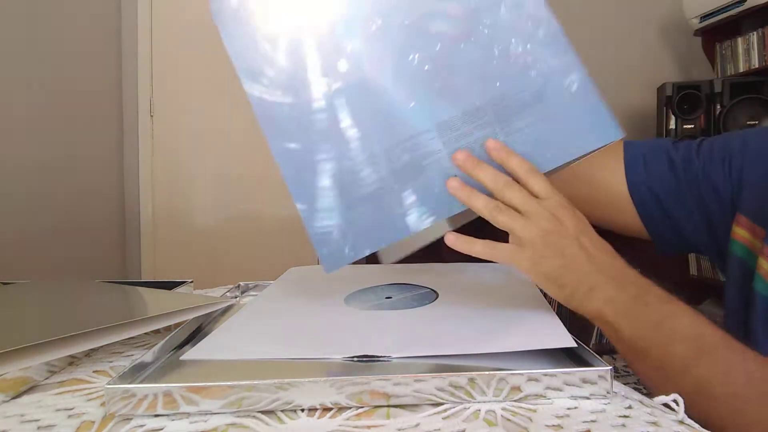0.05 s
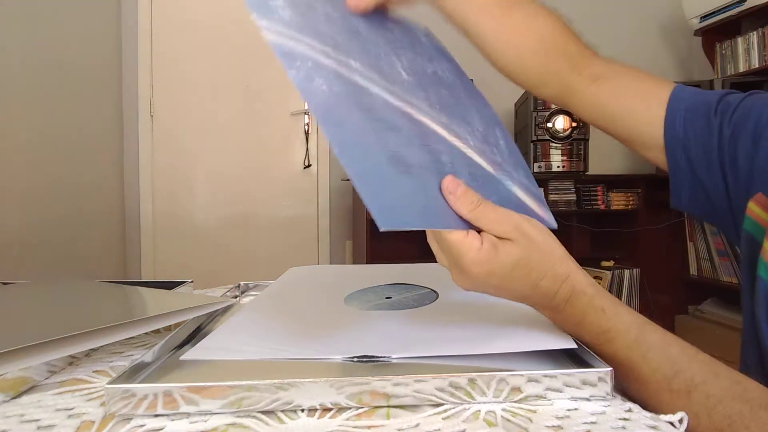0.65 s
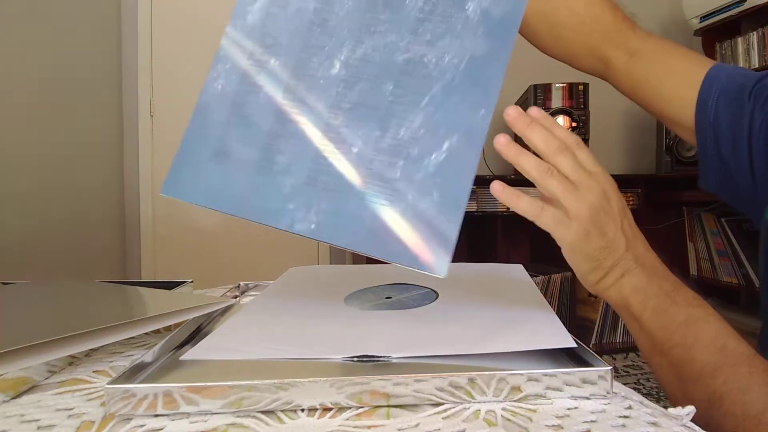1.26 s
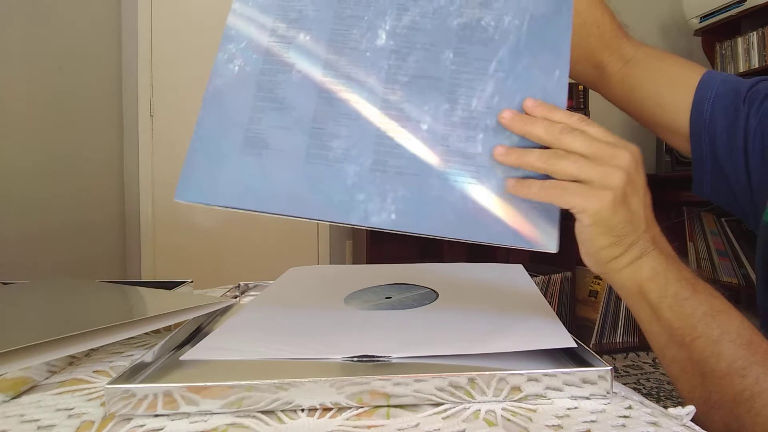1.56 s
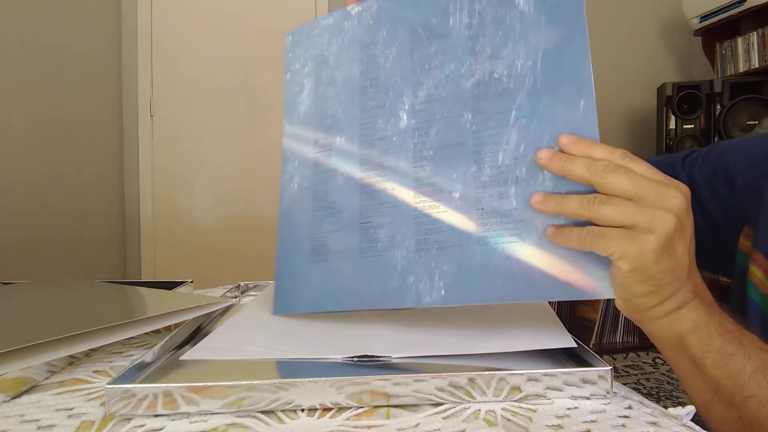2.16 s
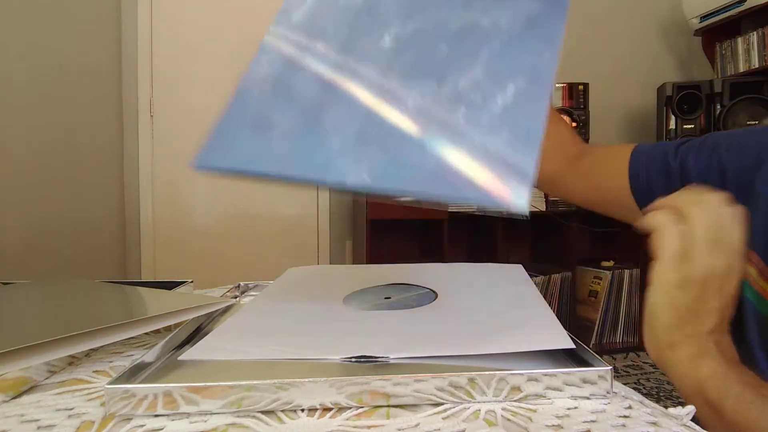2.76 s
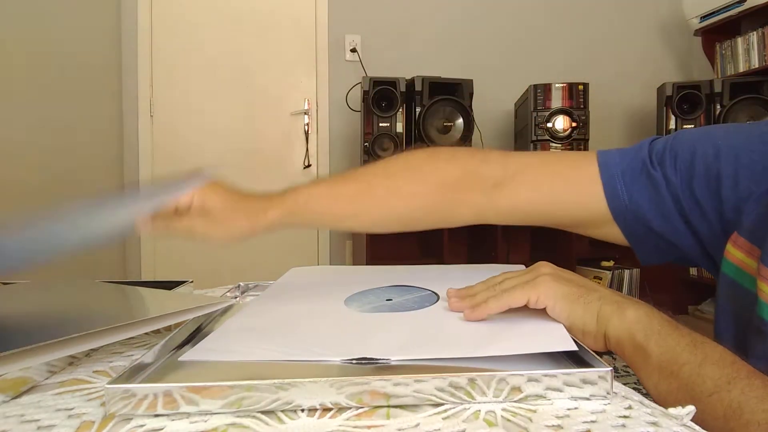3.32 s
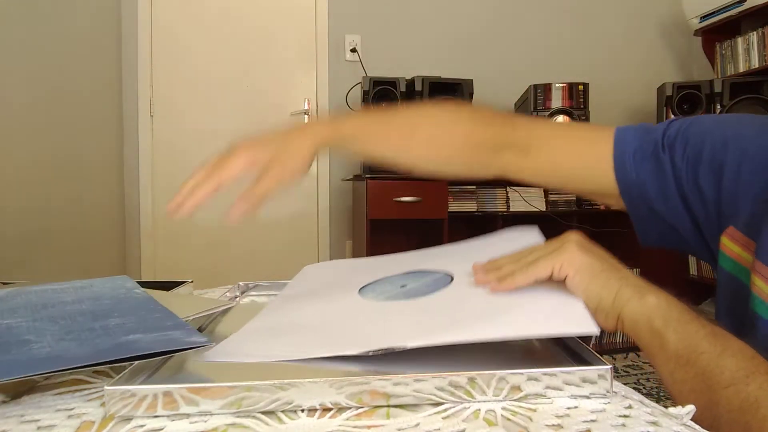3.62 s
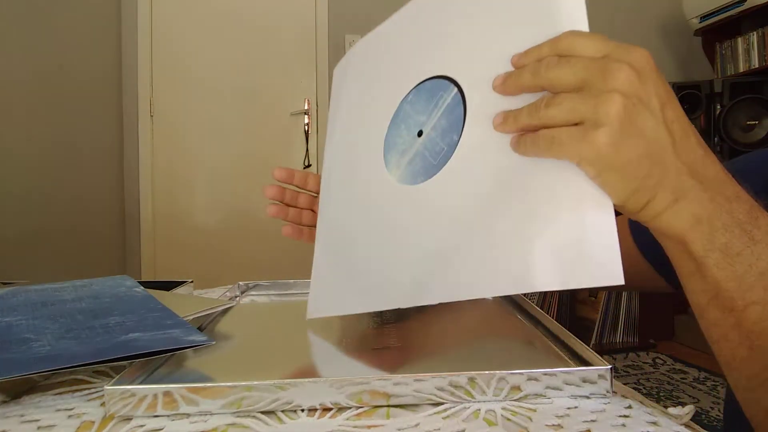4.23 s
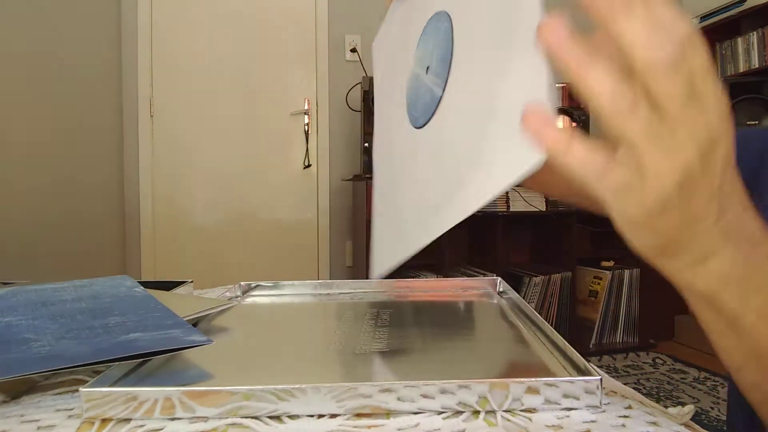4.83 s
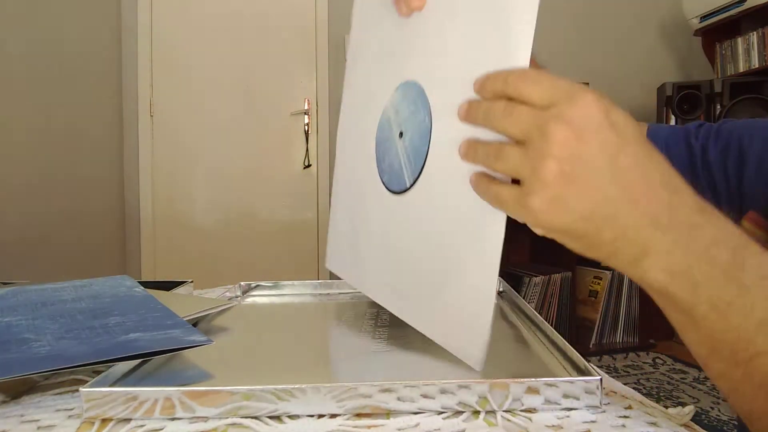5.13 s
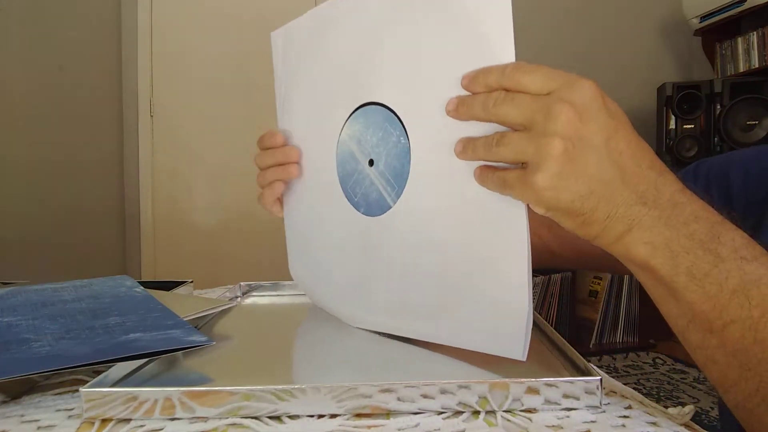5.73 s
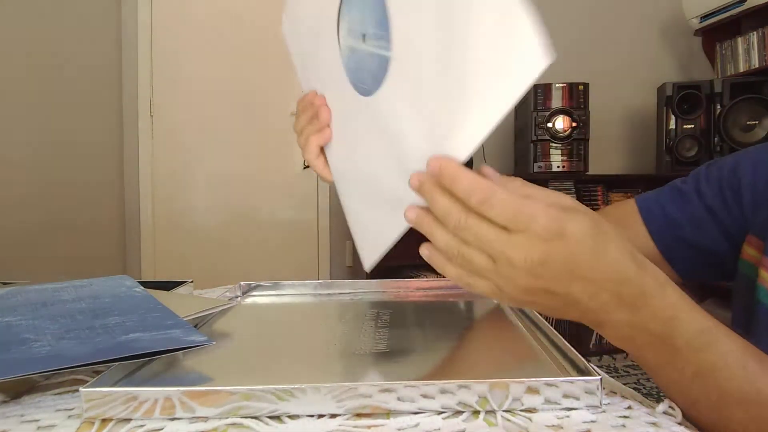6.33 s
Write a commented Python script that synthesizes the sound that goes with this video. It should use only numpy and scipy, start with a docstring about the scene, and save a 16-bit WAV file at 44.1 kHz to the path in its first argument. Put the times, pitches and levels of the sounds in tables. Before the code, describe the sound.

A card insert is turned over in the hands, flexing with soft hollow bumps and a grainy sliding hiss. After a quieter stretch of finger rubs it is set down with a few knocks. A record in its paper sleeve is then lifted from a box and turned, with louder swipes, scrapes, crinkles and taps. The sound is close, in phone stereo, in a small furnished room with faint background noise.

```python
"""A grainy hiss of sliding paper comes first, close to a phone's two microphones in a small furnished room.
A card insert and a record in its paper sleeve are lifted from a box and turned over. Fibres catch and slip
under the fingers, bent sheets flutter and give way with hollow notes, hands and disc knock the card,
creases tick and edges scrape. Faint room noise lies underneath; the phone widens it all into stereo."""
import sys
import numpy as np
from scipy import signal
from scipy.fft import rfft, irfft
from scipy.io import wavfile

SR = 44100
rng = np.random.default_rng(int(sys.argv[2]) if len(sys.argv) > 2 else 0)


def wav_record(signal):
    """Record a signal, one row per channel, as 16-bit PCM in the file named by sys.argv[1]."""
    frames = np.transpose(np.atleast_2d(signal))
    bounded = np.clip(frames, -1, 1)
    # unit amplitude maps onto the largest positive 16-bit level
    quanta = np.round(bounded * 32767).astype(np.int16)
    wavfile.write(sys.argv[1], SR, quanta)


N = 281358
TIME = np.arange(N) / SR
FREQ = np.maximum(np.arange(N // 2 + 1) * SR / N, 1)

# spectra of the room tone and the paper's friction: (frequency [Hz], relative density [dB])
ROOM_TONE_SPECTRUM = [(28, -38), (40, -12), (57, 8), (80, -15), (120, -1.5), (200, 2), (300, -6.5),
                      (600, -10), (1100, -8.5), (1700, -15.5), (3500, -13.5), (8000, -19.5), (12500, -24.5),
                      (14200, -47), (14800, -67)]
HISS_SPECTRUM = [(3000, -17), (5500, -11), (7000, -5.5), (8000, -9.5), (9200, -2.5), (10200, -4),
                 (11500, 3), (12900, 2), (14100, 0), (14700, -58)]
RASP_SPECTRUM = [(700, -0.5), (1500, 1), (2200, 0.5), (3000, 7), (3900, 3), (4800, 6), (5700, 3.5),
                 (6800, 0.5), (10000, -4), (14000, -1), (14700, -42)]
FLUTTER_SPECTRUM = [(35, -40), (60, 0.5), (120, -3), (220, -1.5), (420, -1), (680, -2.5), (900, -3),
                    (1250, -5), (1800, -9), (3000, -11.5), (14000, -24), (14700, -64)]
# bands of the rasp and the hiss that swell and fade at random
RASP_CENTRES_HZ, HISS_CENTRES_HZ = 1500 * 2 ** (np.arange(5) * .6), 6000 * 2 ** (np.arange(5) * .3)
# the held sheets are never quite still: (time [s], hiss [dB], flutter [dB])
GRIP = [(0, -69.5, -72), (0.42, -61.5, -85), (0.6, -70.5, -71), (1.1, -67.5, -62), (1.9, -66.5, -65.5),
        (2.2, -72.5, -67.5), (2.6, -69.5, -67), (3.3, -62.5, -64.5), (3.9, -61, -62), (4.8, -62, -60.5),
        (5.0, -69, -59), (5.5, -60, -66), (6.38, -63, -62)]
# long drags of sheet over sheet: (start [s], attack [s], length [s], hiss [dB], rasp re hiss [dB])
DRAGS = [(0.036, 0.0091, 0.31, -58.5, -3), (0.619, 0.013, 0.44, -55, -5.5), (1.439, 0.009, 0.16, -62, 3),
         (2.28, 0.071, 0.21, -62, 6), (2.93, 0.16, 0.25, -59.5, -33), (3.311, .005, 0.18, -53.5, -0.5),
         (3.542, 0.076, 0.35, -51.5, -6), (3.895, 0.018, 0.23, -61, 1.5), (4.278, 0.0067, 0.4, -52.5, -2),
         (5.044, 0.017, 0.31, -53, -4), (5.23, 0.0074, 0.17, -42.5, -3), (5.596, 0.008, 0.265, -46.5, -5.5),
         (5.982, 0.044, 0.43, -59, -9)]
# quick swipes of a finger or sheet; widths under 0.01 s count as 0.01 s:
# (fastest moment [s], width to fade 20 dB either side [s], hiss [dB], rasp re hiss [dB])
SWIPES = [(0.735, 0.05, -44.5, -5), (0.783, 0.03, -46, -13), (0.968, 0.02, -42.5, -7.5),
          (1.727, 0.06, -45.5, -9.5), (2.06, 0.04, -53, 2), (2.352, -0.06, -48.5, -1),
          (2.428, -0.0067, -49.5, 2.5), (2.53, 0.1, -57, -6), (2.715, 1.4, -68, -9),
          (2.885, -0.1, -58.5, -12.5), (3.374, 0.04, -48, -20), (3.448, 0.01, -44.5, -11),
          (3.74, 0.18, -51.5, -7), (4.384, 0.05, -42, -4.5), (4.48, 0.016, -43, 5),
          (4.541, 0.035, -42, -1.5), (4.636, 0.07, -43, -4.5), (5.258, -0.01, -49.5, 9),
          (5.614, 0.02, -46, -3), (5.737, 0.01, -38, -2.5), (5.838, 0.1, -46, -24),
          (6.218, 0.13, -52.5, -19), (6.295, -0.0338, -37.5, -12), (6.374, 0.03, -39.5, -28)]
# a sheet is bent and settles: (start [s], flutter [dB], time to fade 20 dB [s], taken as 1 ms at least)
FLEXES = [(0.037, -54.5, 1.05), (0.183, -49.5, 0.27), (0.633, -51.5, 0.5), (0.965, -53.5, 0.5),
          (1.445, -51, 0.03), (2.26, -55.5, 0.8), (2.412, -48.5, 0.09), (3.318, -45, 0.32),
          (3.619, -55, 0.6), (4.033, -54, 0.3), (4.277, -51.5, .5), (4.511, -49, 0.32), (5.075, -55, 4),
          (5.233, -44, 0.06), (5.40, -56.5, 1.5), (5.679, -46.5, 0.06), (5.911, -59, -1.7)]
# resonances of the sheets and the box: (frequency [Hz], t60 [s], relative level [dB])
CARD_MODES = [(97, 0.87, -6), (146, 0.34, 1.5), (249.6, 0.35, 3.5), (301, 0.043, -4.5), (337, 0.063, -10),
              (400, 0.018, -7.5), (608, 0.038, -8), (682, 0.31, -25), (1003, 0.11, -18), (1230, 0.12, -47)]
# knocks and flaps of the card and the sleeved disc:
# (time [s], level [dB], centre [Hz], t60 [s], thump [dB], hardness [0-1])
KNOCKS = [(0.044, -56, 870, 0.015, -60, 0.7), (0.08, -50, 320, 0.2, -54, 0.1),
          (0.136, -49.5, 396, 0.037, -56, 0.34), (0.2, -51, 700, 0.073, -50.5, .1),
          (0.233, -52, 480, 0.086, -50, 0), (0.254, -43.5, 1150, 0.081, -56, 0.5),
          (0.415, -56.5, 262, 0.12, -50, 0.33), (0.6317, -57, 1010, 0.02, -55, 0.7),
          (0.642, -46.5, 340, 0.46, -46.5, .1), (0.994, -51.5, 365, 0.28, -48.5, 0.6),
          (1.451, -57, 900, 0.066, -62, .5), (1.555, -61, 600, 0.02, -64, 0.7),
          (2.259, -49, 603, 0.012, -53.5, 0.8), (2.272, -57.5, 290, 0.095, -58, 0),
          (2.435, -54.5, 298, 0.31, -64, 0), (3.318, -42, 414, 0.034, -47, 1),
          (3.332, -42.5, 745, 0.05, -60, 0.8), (3.371, -44.5, 610, 0.025, -60, 0.9),
          (3.46, -48, 597, 0.056, -53.5, 0.6), (3.598, -54.5, 500, 0.016, -80, 0.3),
          (3.633, -52, 700, 0.025, -64, 0.5), (3.69, -50.5, 385, 0.084, -52.5, 0.1),
          (4.0331, -39.5, 980, 0.17, -56, 0.89), (4.285, -43.5, 980, 0.055, -54.5, 0),
          (4.401, -48, 282, 0.082, -50, 0.3), (4.518, -45, 1190, 0.068, -63, 0.15),
          (4.5549, -42, 1050, 0.1, -50, 0.5), (4.559, -38.5, 300, 0.026, -42.5, 0.67),
          (4.578, -43.5, 600, 0.052, -68, 0.03), (4.627, -35, 706, 0.049, -39, 0.8),
          (5.076, -58, 486, 0.094, -46, 0.93), (5.16, -50.5, 366, 0.029, -59, 0.8),
          (5.237, -36.5, 1000, 0.2, -44, 0.26), (5.2846, -31, 690, 0.0098, -48, 1),
          (5.343, -39.5, 764, 0.016, -59, 0.7), (5.40, -50.5, 590, 0.027, -69, 0.6),
          (5.425, -49, 398, 0.036, -60, 0), (5.516, -51, 606, 0.028, -79, 0.6),
          (5.701, -41, 754, 0.17, -63, 0.2), (5.788, -53, 520, 0.12, -63, 0),
          (5.878, -45, 610, 0.025, -63, 0.8), (5.886, -48, 445, 0.033, -56.5, 0.9),
          (5.911, -40.5, 670, 0.012, -66, .7)]
# crease ticks and finger scuffs:
# (time [s], treble [dB], treble centre [Hz], snap [dB], snap centre [Hz], t60 [s], hardness [0-1])
TICKS = [(0.045, -60, 10100, -56.5, 2830, 0.012, 0.7), (0.194, -64, 10000, -59, 3500, 0.016, 0.7),
         (0.259, -47, 11000, -58, 3000, 0.089, 0.2), (0.6327, -43.5, 12300, -50.5, 2700, 0.015, 0.7),
         (1.017, -47.5, 12400, -63, 3500, 0.048, 0.3), (1.45, -48.5, 10500, -48.5, 2500, 0.15, 0.4),
         (1.554, -56, 9800, -56.5, 4020, 0.0087, 0.5), (1.5566, -55, 9800, -60, 4200, .012, 0.4),
         (2.09, -54, 11000, -66, 3500, 0.06, 0.1), (2.2597, -61, 9500, -45.5, 2230, 0.02, 0.45),
         (2.415, -53.5, 9800, -52, 3100, 0.062, 0.2), (2.479, -50, 10000, -57, 3100, 0.02, 0.2),
         (3.3175, -50, 10900, -53, 2830, 0.044, 0.3), (3.329, -46.5, 10900, -51, 2800, 0.032, 0.3),
         (3.46, -61, 10900, -47.5, 3060, 0.058, 0.2), (3.633, -43.5, 9050, -41.5, 3850, 0.021, 0.24),
         (3.648, -46, 11700, -50, 3300, 0.015, 0), (4.0341, -66, 9200, -41.5, 2930, 0.0094, 0.4),
         (4.279, -47.5, 10400, -55, 3000, 0.059, 0.3), (4.346, -44, 9200, -67, 3500, 0.014, 0.2),
         (4.463, -39.5, 8250, -51, 3600, 0.13, 0.6), (4.626, -33, 10800, -45, 3180, 0.03, 0.2),
         (4.701, -47, 12100, -56, 3200, 0.0032, 0.2), (5.075, -46.5, 12500, -75, 3100, .03, 0.4),
         (5.104, -47, 11900, -55, 5000, 0.02, 0), (5.237, -36, 9100, -31, 3580, 0.009, 0.1),
         (5.283, -42, 9750, -39, 3050, 0.038, 0.3), (5.409, -43.5, 10000, -37.5, 3140, 0.025, 0),
         (5.911, -54.5, 8900, -42.5, 2100, 0.026, 0.4), (6.1554, -31, 14000, -51.5, 4530, 0.0053, 0.04),
         (6.2814, -32, 9100, -47, 3280, 0.084, 0.25), (6.356, -47, 10700, -47.5, 5770, 0.024, 0)]
# a bowed sheet gives way: (time [s], level [dB], first pitch [Hz], final pitch [Hz], swell [s], t60 [s])
HOLLOW_NOTES = [(0.078, -44.5, 290, 310, 0.0063, 0.081), (0.193, -37, 323, 854, 0.006, 0.068),
                (0.229, -40, 420, 340, 0.0038, 0.034), (3.318, -42, 197, 148, 0.016, 0.087),
                (3.364, -49, 199, 260, 0.0039, 0.038), (3.378, -40.5, 554, 596, 0.0047, 0.13),
                (4.556, -39.5, 240, 166, 0.0053, 0.049), (4.579, -44.5, 562, 328, 0.003, 0.082),
                (4.621, -39, 278, 810, 0.0016, 0.032), (4.622, -43, 199, 139.6, 0.004, 0.22),
                (5.787, -43, 500, 440, 0.0022, 0.027)]
# an edge scrapes: (strongest moment [s], width as for swipes [s], level [dB], centre [Hz], band [octaves])
SCRAPES = [(0.733, -0.05, -44, 12800, 0.1), (0.735, 0.1548, -54.5, 3060, 0.55),
           (0.975, 0.02, -42.5, 12800, 0.079), (1.735, 0.06, -49, 11300, 0.22),
           (3.364, 0.08, -54.5, 4120, .3), (3.435, 0.05, -62, 3450, .1), (4.388, 0.05, -48, 4400, 0.27),
           (4.477, 0.01, -47, 3720, 0.22), (4.544, -0.04, -43.5, 3460, 0.078),
           (5.73, 0.08, -44, 6060, 0.39), (5.735, 0.14, -48.5, 9900, 0.26), (6.097, -0.32, -57, 3460, 0.62)]
# reverberation of the small room: (frequency [Hz], t60 [s])
ROOM_DECAY = [(100, 0.19), (500, 0.25), (2000, 0.3), (6000, 0.048), (14000, 0.031)]
# the phone's stereo image: (frequency [Hz], lean to the right [0-1])
STEREO_LEAN = [(60, 1), (130, 1), (280, 0.63), (600, 0.47), (1175, 0.11), (2350, 0.35), (3500, 0.59),
               (4700, 0.29), (6000, 0.79), (8000, 0.81), (11000, 0.56), (14000, 0.83)]


def amp(db):
    """Decibels to gain."""
    return 10 ** (np.asarray(db) / 20)


def unit(x):
    """Scale to rms 1."""
    return x / np.sqrt(np.mean(x ** 2))


def decay(t, t60):
    """A fade of 60 dB every t60 seconds."""
    return np.exp(-np.log(1000) * t / t60)


def along(table, hz=FREQ):
    """Read a (frequency [Hz], value) table on a log-frequency axis."""
    table_hz, value = np.transpose(table)
    return np.interp(np.log(hz), np.log(table_hz), value)


def colour(x, spectrum):
    """Give a sound a spectrum, at rms 1."""
    return unit(irfft(rfft(x) * amp(along(spectrum)), N))


def wander(rate_hz):
    """Smooth random motion up to about rate_hz, at rms 1."""
    return unit(irfft(rfft(rng.standard_normal(N)) * np.exp(-(FREQ / rate_hz) ** 2), N))


def mic_noise(likeness, size=N):
    """Noise at the two microphones; likeness is the share of power they have in common."""
    shared, own = rng.standard_normal(size), rng.standard_normal((2, size))
    return np.sqrt(likeness) * shared + np.sqrt(1 - likeness) * own


def band(x, hz, octaves, order=1):
    """Band-pass around a centre."""
    edges = np.minimum(hz * 2 ** (np.array([-.5, .5]) * octaves), [.4 * SR, .47 * SR])
    return signal.sosfilt(signal.butter(order, edges, "band", fs=SR, output="sos"), x)


def place(track, s, x, db):
    """Place a short sound; db is its level spread over 10 ms."""
    start = int(s * SR)
    x = x * amp(db) * np.sqrt((SR // 100) / np.mean(np.sum(x ** 2, axis=1)))
    track[:, start:start + x.shape[1]] += x[:, :N - start]


def gesture(s, attack, hold, release):
    """Loudness of a movement that sets in, keeps going, then fades 20 dB every release seconds."""
    age = TIME - s
    onset = np.clip(age / max(attack, 1e-3), 0, 1)
    return onset * amp(-20 * np.maximum(age - hold, 0) / max(release, 1e-3))


def swipe(s, width):
    """Loudness of a stroke that speeds up to one moment and slows down again."""
    distance = np.arccosh(10) * np.abs(TIME - s) / max(width, 1e-2)
    return 1 / np.cosh(np.minimum(distance, 20))


def grip_levels():
    """Hiss and flutter of the held sheets through the scene, in dB."""
    times, *levels = np.transpose(GRIP)
    return [np.interp(TIME, times, db) for db in levels]


def together(moves, grip_db):
    """Movements (shape, level [dB]) add in power, over the faint stir of the grip."""
    return np.sqrt(amp(grip_db) ** 2 + sum((shape * amp(db)) ** 2 for shape, db in moves))


def room_tone():
    """Steady, faint room noise, unrelated at the two microphones."""
    return colour(rng.standard_normal((2, N)), ROOM_TONE_SPECTRUM) * amp(-62)


def friction(spectrum, grain_db, judder_db, judder_hz, likeness, snags_per_s=0):
    """Paper fibres catch and let go: a dense run of uneven slips in bunches, with scattered snags."""
    slips = mic_noise(likeness) * amp(grain_db * wander(1500))
    snags = (rng.random(N) < snags_per_s / SR) * rng.uniform(-13, 13, N)
    judder = amp(judder_db * wander(judder_hz))
    return unit(colour(slips + snags, spectrum) * judder)


def patchy(x, centres, depth_db, rate_hz):
    """Bands of the hiss or rasp swell and fade at random, giving a patchy sound."""
    octaves = np.log2(centres[1] / centres[0]) * 2 / 3
    patches = sum(band(x, hz, octaves) * (amp(depth_db * wander(rate_hz)) - 1) for hz in centres)
    return unit(x + patches)


def sliding():
    """Skin and paper glide with a fine hiss; a pressed edge adds a lower, coarser rasp."""
    strokes = [(swipe(s, width), db, rasp_db) for s, width, db, rasp_db in SWIPES]
    strokes += [(gesture(s, attack, length, release=0.073), db, rasp_db)
                for s, attack, length, db, rasp_db in DRAGS]
    hiss = friction(HISS_SPECTRUM, grain_db=1.4, judder_db=1.35, judder_hz=69,
                    likeness=0.69, snags_per_s=33)
    rasp = friction(RASP_SPECTRUM, grain_db=-0.5, judder_db=1.5, judder_hz=71.4,
                    likeness=0.3, snags_per_s=63)
    hiss = patchy(hiss, HISS_CENTRES_HZ, depth_db=2.0, rate_hz=33)
    rasp = patchy(rasp, RASP_CENTRES_HZ, depth_db=3.0, rate_hz=29)
    grip_db, _ = grip_levels()
    hiss_gain = together([(shape, db) for shape, db, _ in strokes], grip_db)
    rasp_gain = together([(shape, db + rasp_db) for shape, db, rasp_db in strokes], grip_db - 2.5)
    return hiss * hiss_gain + rasp * rasp_gain


def card_body(push, ring_db):
    """A push is radiated at once and leaves the sheets and the box ringing briefly."""
    t = TIME[:SR // 3]
    ring = 0
    for hz, t60, db in CARD_MODES:
        gain = amp(db) * 2 * np.log(1000) / (t60 * SR)  # peak height independent of ring time
        ring = ring + gain * decay(t, t60) * np.cos(2 * np.pi * hz * t)
    return push + amp(ring_db) * signal.fftconvolve(push, ring[None], axes=1)[:, :N]


def bending():
    """The flexing sheet flutters with soft, low buckles."""
    bends = [(gesture(s, attack=0.0024, hold=0.0024, release=settle), db) for s, db, settle in FLEXES]
    _, grip_db = grip_levels()
    flutter = friction(FLUTTER_SPECTRUM, grain_db=1.0, judder_db=2.5, judder_hz=59, likeness=0.33)
    return unit(card_body(flutter, ring_db=-7.5)) * together(bends, grip_db)


def contact(t60, hardness, likeness):
    """A hard contact starts with one sharp slip, a soft one swells; smaller slips crackle away."""
    t = TIME[:SR // 4]
    rise_s = max(0.051 * t60 * (1 - hardness), 1 / SR)
    slips = mic_noise(likeness, len(t)) * np.minimum(t / rise_s, 1) * decay(t, t60)
    slips[:, 0] += 20 * hardness  # the first slip
    return slips


def knocks():
    """Hands and the disc's edge bump the card; heavy bumps make the whole sheet thump."""
    track = np.zeros((2, N))
    for s, db, hz, t60, thump_db, hardness in KNOCKS:
        blow = contact(t60, hardness, likeness=0.64)
        push = band(blow, hz, octaves=1.09)
        place(track, s, band(push, hz=645, octaves=4.74, order=2), db)
        place(track, s, band(blow, hz=142, octaves=1.5, order=2), thump_db)
    return card_body(track, ring_db=5.0)


def crease_ticks():
    """A crease lets go: a bright crack and the snap of the stiff paper around it."""
    track = np.zeros((2, N))
    for s, treble_db, treble_hz, snap_db, snap_hz, t60, hardness in TICKS:
        slip = contact(t60, hardness, likeness=.8)
        place(track, s, band(slip, treble_hz, octaves=0.7, order=2), treble_db)
        place(track, s, band(slip, snap_hz, octaves=0.82, order=2), snap_db)
    return track


def hollow_notes(glide_s=0.0135, rattle_gain=0.43):
    """A bowed sheet gives way with a hollow note whose pitch slides as its tension changes."""
    track, t = np.zeros((2, N)), TIME[:SR // 4]
    for s, db, from_hz, to_hz, swell, t60 in HOLLOW_NOTES:
        hz = to_hz + (from_hz - to_hz) * np.exp(-t / glide_s)
        tone = np.sin(2 * np.pi * np.cumsum(hz) / SR)
        rattle = unit(band(mic_noise(0.18, len(t)), to_hz, octaves=0.52))
        shape = np.minimum(t / swell, 1) * decay(np.maximum(t - swell, 0), t60)
        place(track, s, shape * (tone + rattle_gain * rattle), db)
    return track


def edge_scrapes():
    """An edge runs over the paper and briefly makes one of its resonances sing."""
    slips = mic_noise(likeness=0.54) * amp(2.0 * wander(100))
    return sum(unit(band(slips, hz, octaves, order=2)) * swipe(s, width) * amp(db)
               for s, width, db, hz, octaves in SCRAPES)


def room_tail(x, low_db, high_db):
    """The small furnished room's diffuse tail, octave by octave, 4 ms behind the direct sound."""
    t = TIME[:SR // 2]
    tail = 0
    for hz in 100 * 2 ** np.arange(8):
        fade = decay(t, along(ROOM_DECAY, hz)) * (t > .004)
        wet_db = along([(300, low_db), (8000, high_db)], hz)
        reflections = band(rng.standard_normal((2, len(t))), hz, octaves=1, order=2)
        tail = tail + amp(wet_db) * reflections * fade / np.linalg.norm(fade)
    return signal.fftconvolve(x, tail, axes=1)[:, :N]


def scene():
    """The handling close to the two microphones, with the room behind it."""
    rubs = sliding() + bending() + edge_scrapes()
    hits = crease_ticks() + knocks() + hollow_notes()
    reverb = room_tail(rubs, low_db=-5.5, high_db=-11) + room_tail(hits, low_db=-8, high_db=-8)
    return rubs + hits + reverb + room_tone()


def record(dry, twist_from_hz=1175, half_turn_hz=2360, top_hz=14900):
    """The phone feeds one microphone to the mid and the other to the side, then cuts the top."""
    first_mic, second_mic = rfft(dry)
    # the sound alternates between centre and sides as frequency rises
    twist = np.pi * np.maximum(FREQ - twist_from_hz, 0) / half_turn_hz
    depth = np.exp(-(FREQ / 8000) ** 2)
    # the image leans right, less so where it lies at the sides; those dips fade towards the top
    lean = np.clip(along(STEREO_LEAN) * (1 - .8 * depth * np.sin(twist) ** 10), 0, 1)
    # it dwells at the centre and at the sides and changes over quickly
    twist = twist - .18 * depth * np.sin(4 * twist)
    mid = first_mic * (np.cos(twist) + 1j * lean * np.sin(twist))
    side = -second_mic * (1j * np.sin(twist) + lean * np.cos(twist))
    wide = irfft(np.array([mid + side, mid - side]), N)
    return signal.sosfilt(signal.ellip(10, .2, 70, top_hz, fs=SR, output="sos"), wide)


dry = scene()
out = record(dry)
wav_record(out)
```